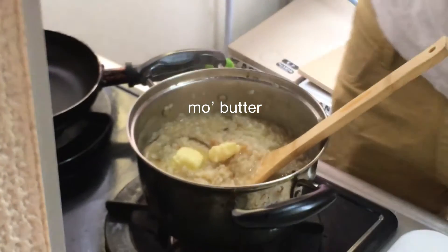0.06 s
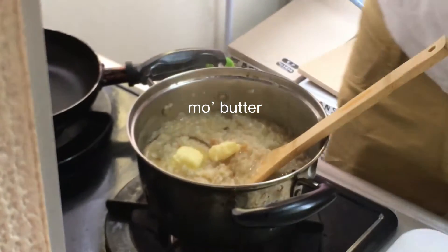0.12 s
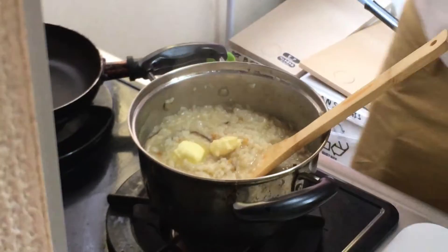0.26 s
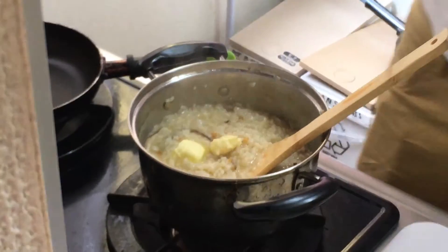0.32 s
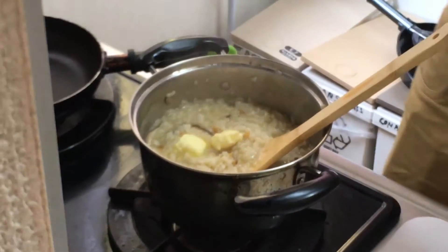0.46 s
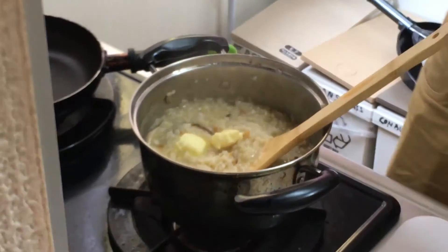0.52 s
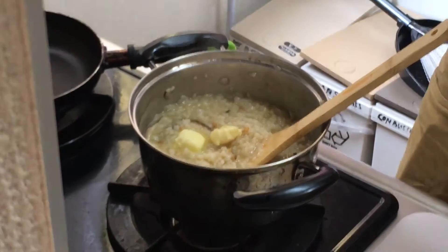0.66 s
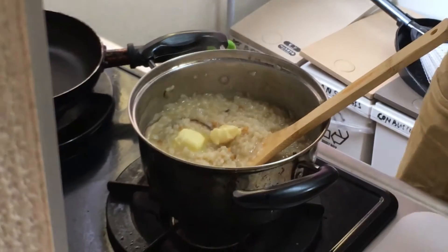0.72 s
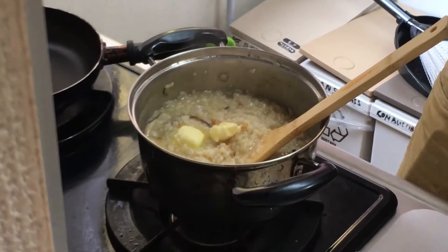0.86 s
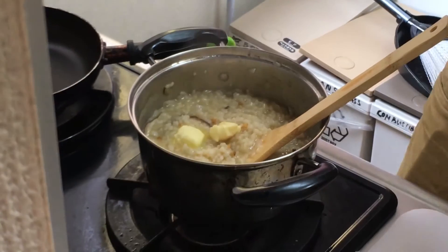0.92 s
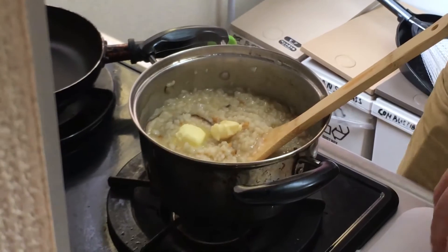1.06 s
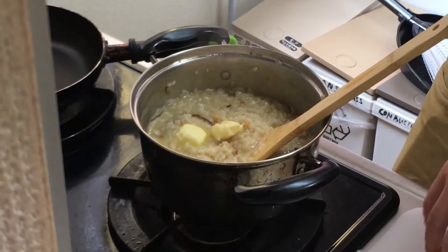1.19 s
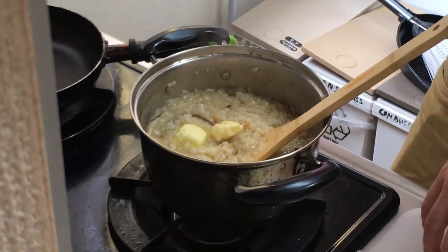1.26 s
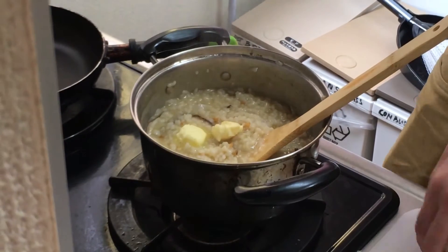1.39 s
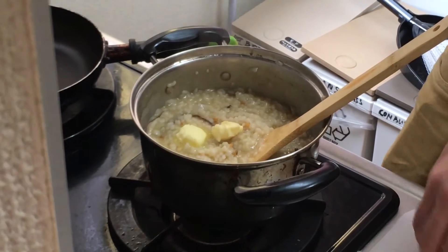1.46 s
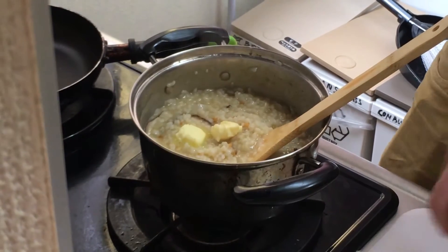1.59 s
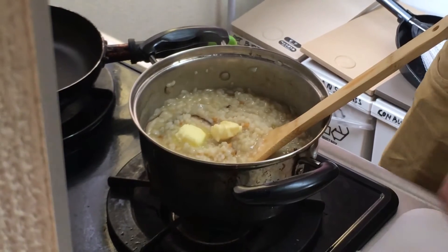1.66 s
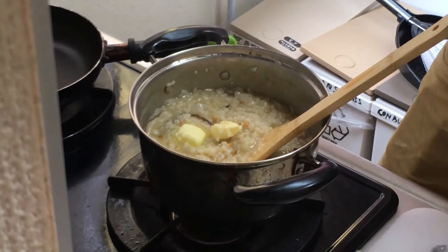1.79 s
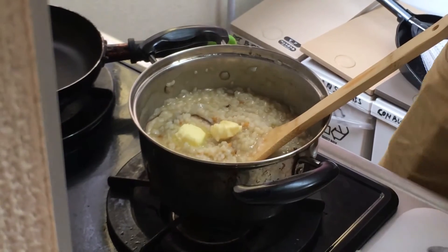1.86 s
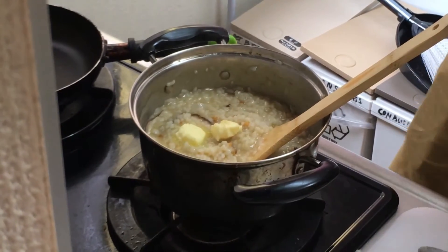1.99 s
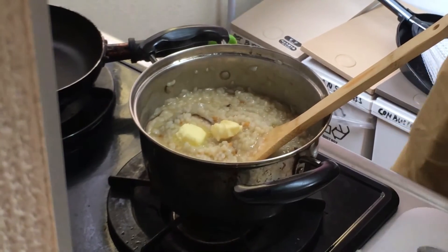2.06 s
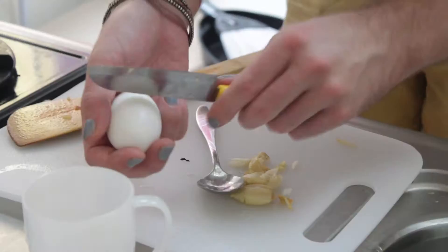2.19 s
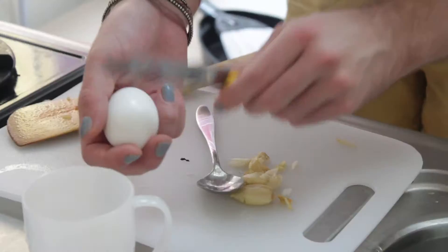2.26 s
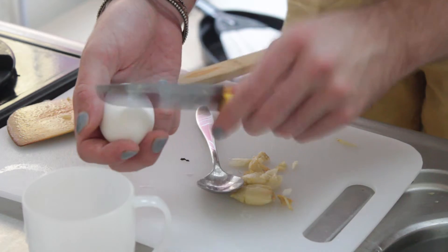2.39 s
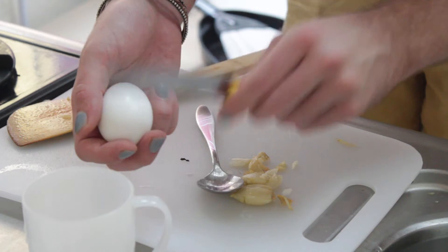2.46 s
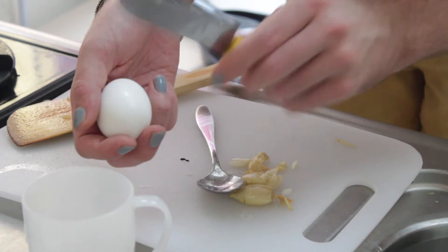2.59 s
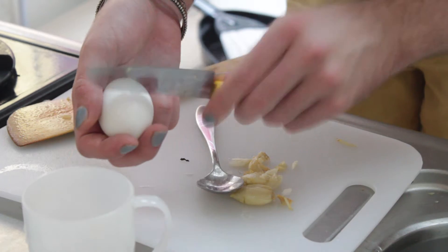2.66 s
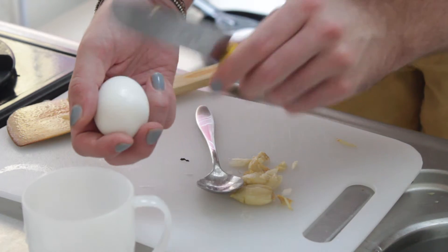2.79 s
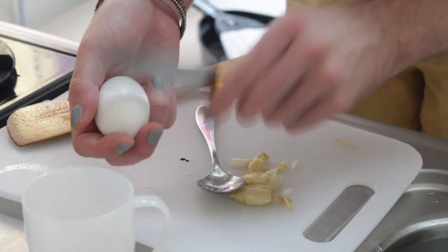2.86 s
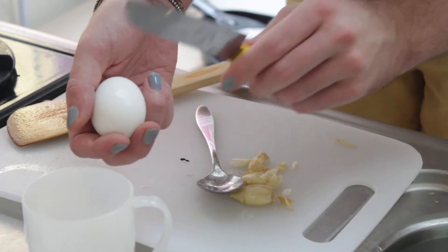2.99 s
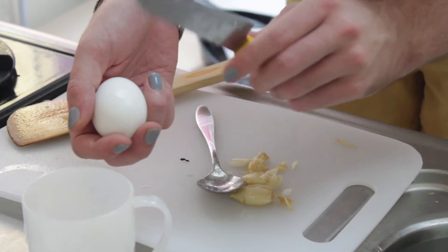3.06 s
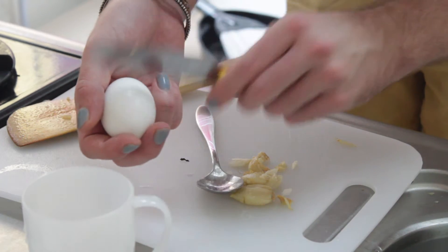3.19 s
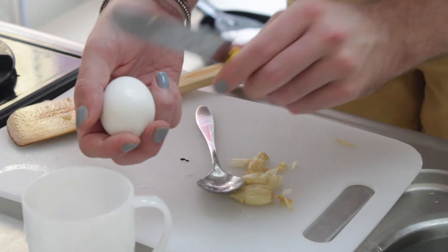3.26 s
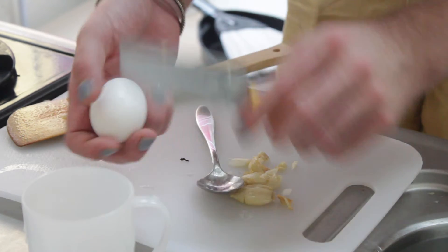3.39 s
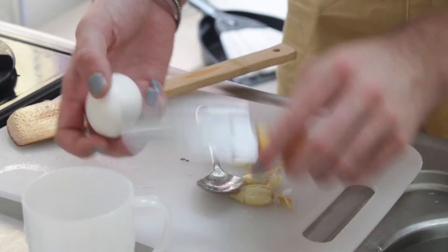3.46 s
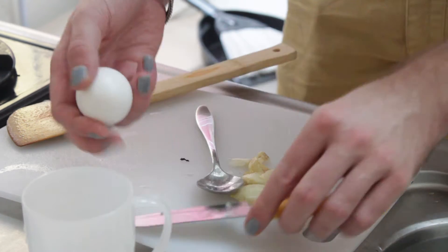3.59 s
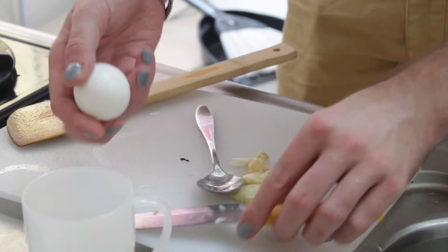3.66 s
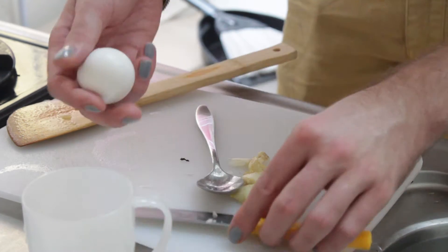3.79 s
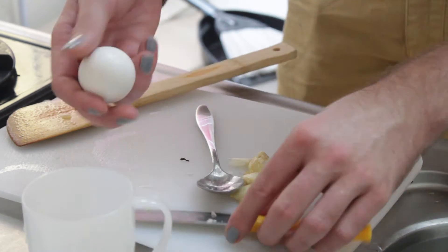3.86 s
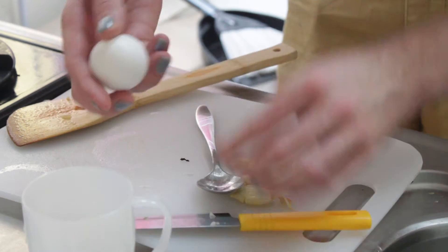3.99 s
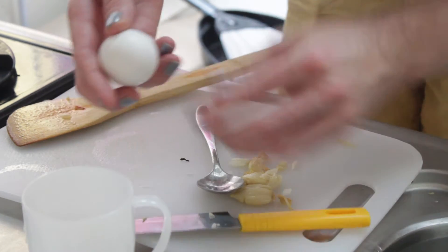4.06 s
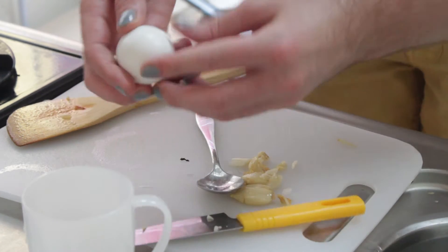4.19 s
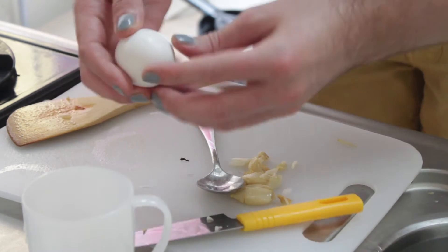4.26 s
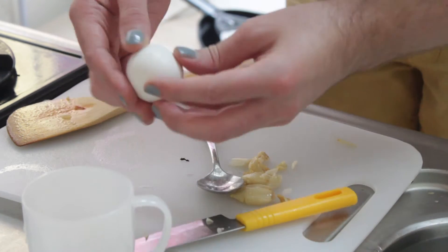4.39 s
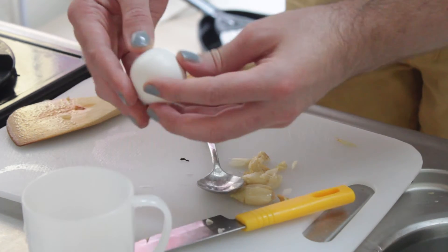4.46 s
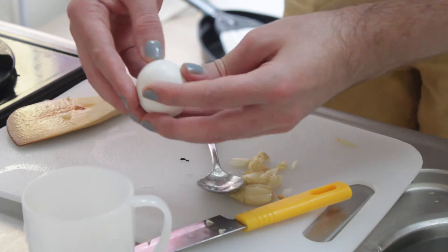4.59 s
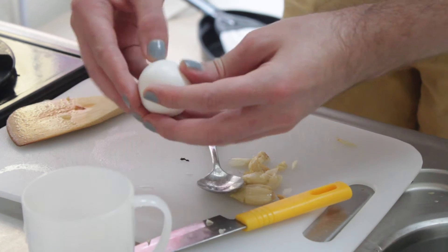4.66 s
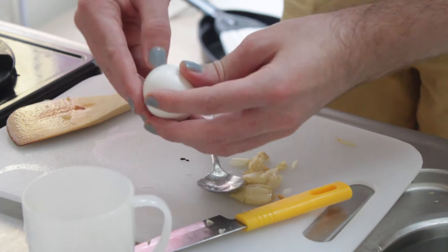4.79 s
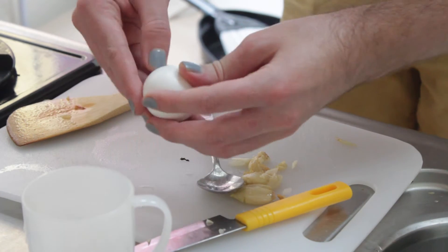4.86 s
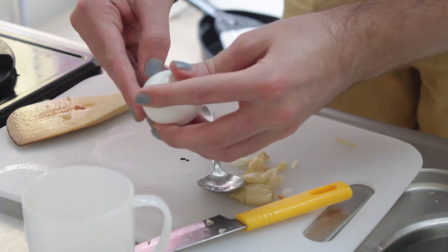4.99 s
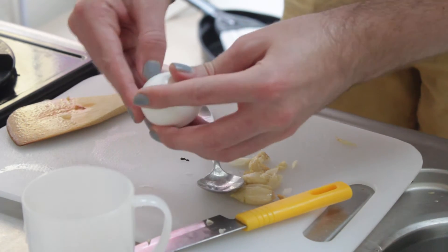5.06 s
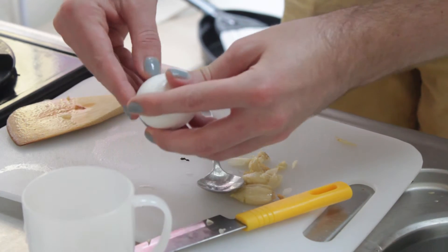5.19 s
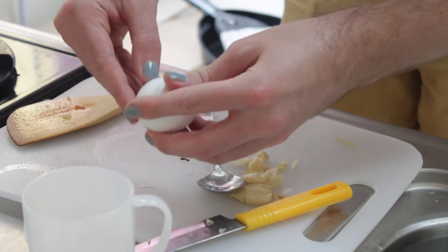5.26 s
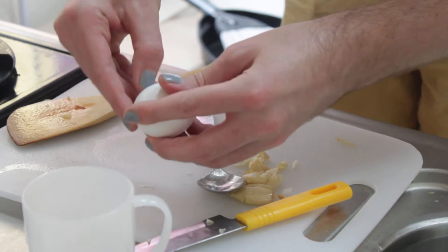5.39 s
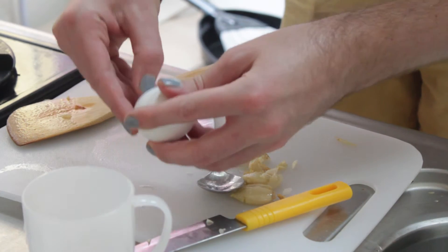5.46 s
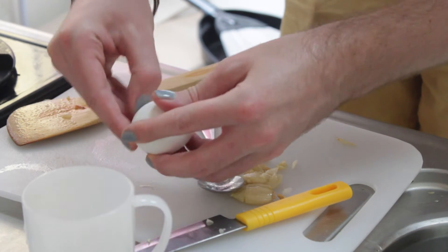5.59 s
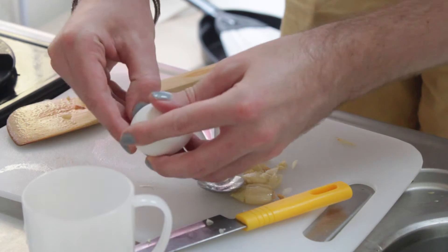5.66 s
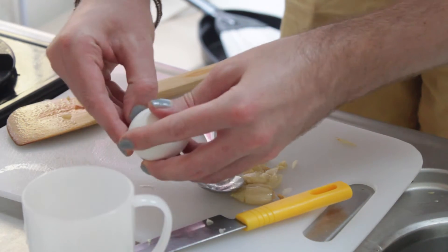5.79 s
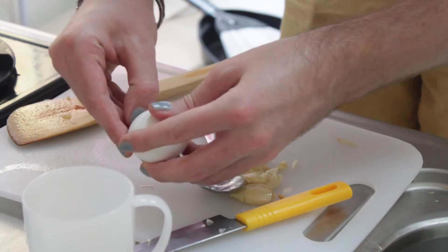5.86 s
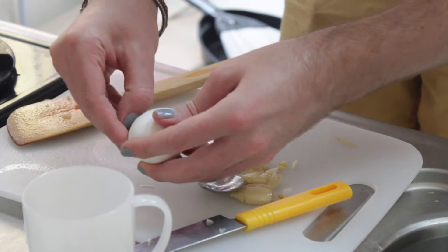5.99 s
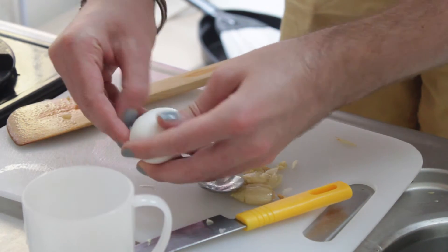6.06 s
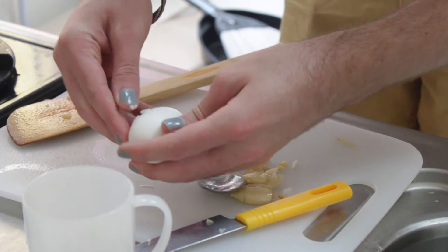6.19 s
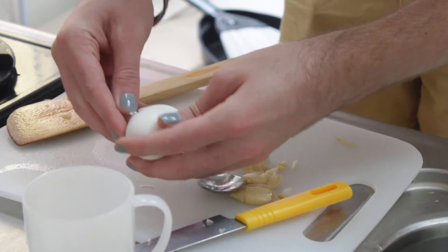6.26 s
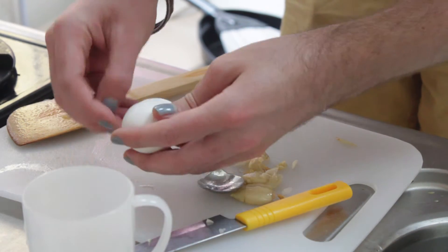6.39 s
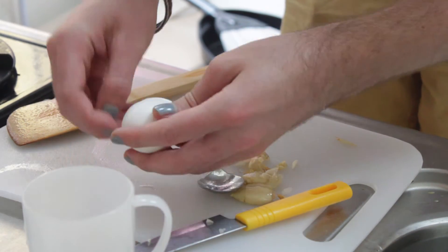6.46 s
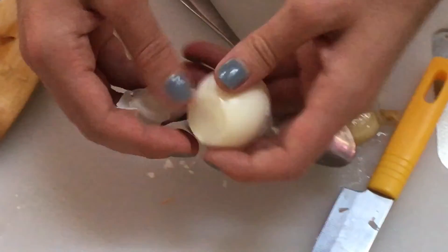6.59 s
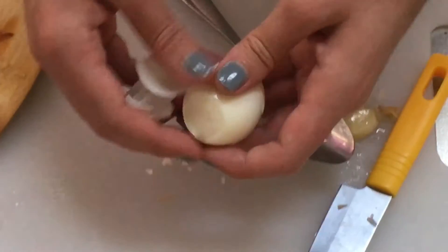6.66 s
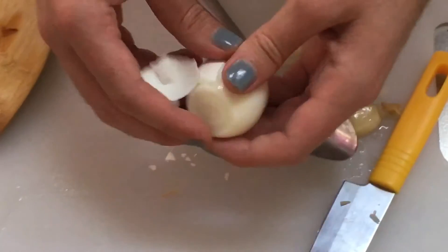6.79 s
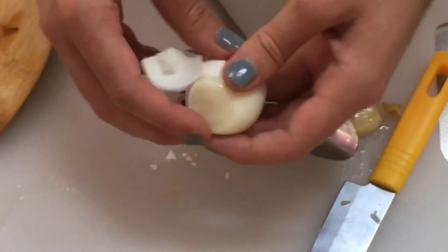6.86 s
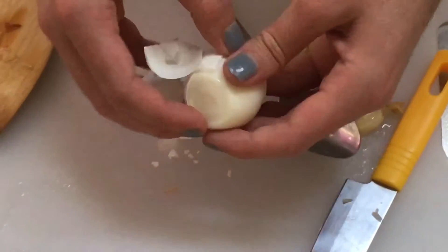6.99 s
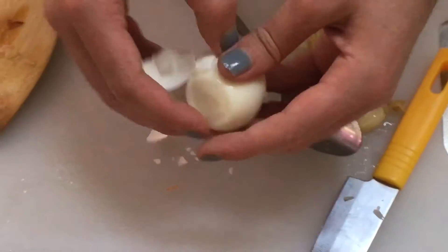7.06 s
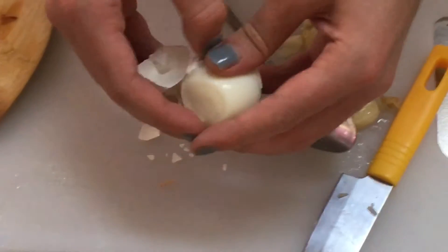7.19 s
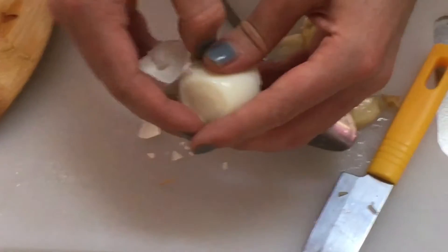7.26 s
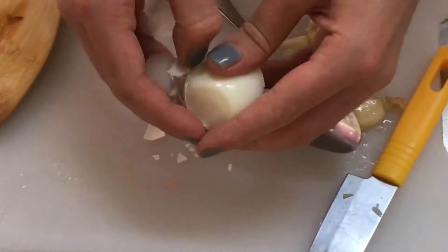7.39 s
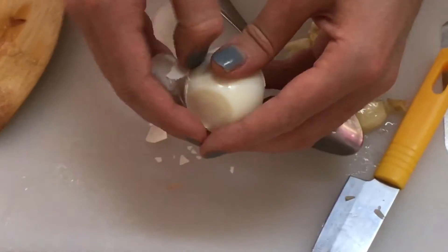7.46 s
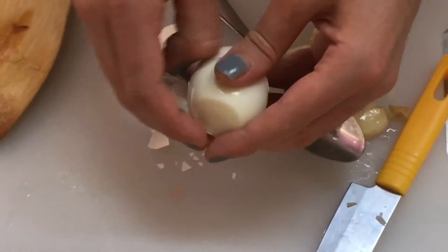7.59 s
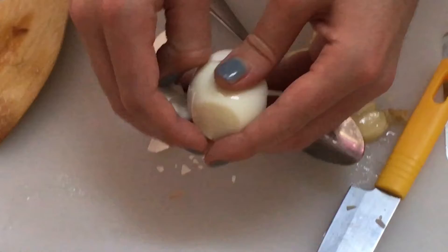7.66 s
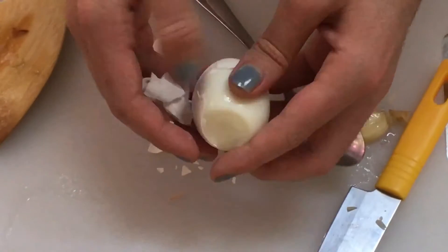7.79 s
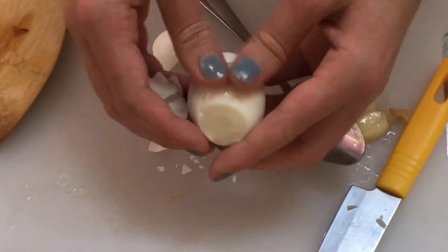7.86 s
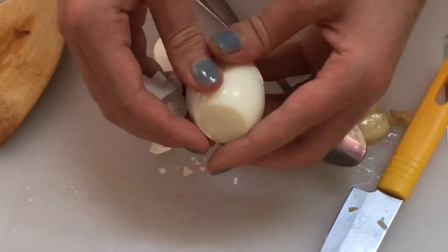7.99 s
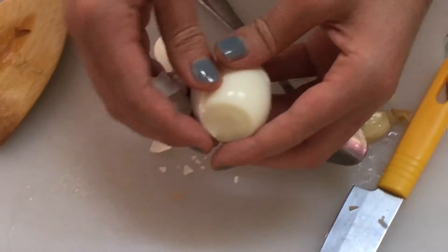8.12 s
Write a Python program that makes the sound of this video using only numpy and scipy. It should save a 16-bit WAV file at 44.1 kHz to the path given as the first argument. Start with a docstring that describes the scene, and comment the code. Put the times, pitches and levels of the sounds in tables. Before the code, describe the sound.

In a small hard kitchen, low rumble carries faint cloth rustles, a tiny bracelet tinkle and soft board knocks. A spoon drops with a clack and short ring. The background switches to simmering and fan hum as a knife cracks an egg with four sharp taps, then clatters onto the board. Close to the microphone, nails make sparse, then dense crisp shell crackles, with fine membrane tearing.

```python
"""A small hard kitchen. First low rumble, rustling cloth, a tinkling bracelet, a spoon falling on a board.
Then a knife taps a boiled egg and is laid down; nails crack and peel the shell; a pot simmers, a fan hums.
Shell breaks are coloured pulses with noise trails; metal is decaying sines; board and pot are noise
through resonances; cloth, scrapes, membrane, fan and room are shaped noise. Hard walls answer the knocks."""
import sys
import numpy as np
from scipy import signal
from scipy.fft import rfft, irfft, next_fast_len
from scipy.io import wavfile
from scipy.ndimage import uniform_filter1d, map_coordinates

SR = 44100
rng = np.random.default_rng(int(sys.argv[2]) if len(sys.argv) > 2 else 0)


def store_wav(level_fs):
    """Save 16-bit WAV to argv[1]."""
    pcm = np.round(np.clip(np.atleast_2d(level_fs), -1, 1) * 32767)
    wavfile.write(sys.argv[1], SR, pcm.T.astype(np.int16))


N = 358974

# All levels in tables are relative: sources add their own gains.
# Knife on egg. Each row: start in seconds, level, body, middle, edge and splintering in dB.
TAPS = [(2.392, -7, -21, -8.5, -13.5, -11), (2.6419, -11, -23.5, -15, -15, -13),
        (2.851, -15, -22, -15, -10, -10.5), (3.1417, -21.5, -7, -7, -9.5, -17)]
# Shell cracks. Each row: start in seconds, level, low part, edge and splintering in dB.
CRACKS = [(4.378, -48, -8, -7, -7), (4.7074, -33, -12.5, -13, -2.5), (4.7414, -32, -19, -8, -19),
          (4.8834, -47, -15, -12, -6), (4.8906, -42, -14, -5, -8), (4.9065, -34.5, -5.5, -6, -16),
          (5.1757, -42, -17, -6, -14), (5.1926, -39, -16, -16, 0), (5.2044, -30.5, -17, -7, -6.5),
          (5.3085, -30.5, -19, -3, -13), (5.3436, -30.5, -19, -9, -13), (5.4537, -26, -18.5, -11.5, -20),
          (5.533, -28, -14, -7, -16), (5.5613, -35, -8, -1, -11), (5.5755, -26.5, -18, -3, -21),
          (5.5893, -27.5, -14, -3, -17), (5.6108, -30, -6, -0.5, -4), (5.8377, -41.5, -10, -7, 4),
          (5.887, -40, -7, -8, -10), (5.9109, -33, -7, -1, 0.5), (6.5572, -35.5, -11, -7, -10),
          (6.6582, -48, -18, -7, -13), (6.7528, -44.5, -8, -6, -5), (6.8096, -40.5, -27, -11, -11),
          (7.0693, -47, -10, 0, -6), (7.0771, -34.5, -6, 1, -20), (7.1826, -35, -7.5, 0, -8),
          (7.2263, -47, -20, -3, -12), (7.2309, -40, -28, -21, -15), (7.2609, -30, -14, -6, -15),
          (7.2915, -40, -22, -3, -16), (7.3, -34, -7, -1, -20), (7.3523, -22.5, -22, -9, -22),
          (7.3734, -30.5, -10.5, -6.5, -6), (7.3958, -33, -13, 0, -13), (7.434, -47, -15, 0, -12),
          (7.4441, -42, -9, 0, -11), (7.5359, -35, 4, -2, -3.5), (7.5415, -36, -4, -7, 4),
          (7.5588, -38, 3, -8, -10), (7.5922, -40, 1.5, -2, -5), (7.6266, -22.5, -25.5, -12, -24),
          (7.648, -33, -19, 1, -8), (7.6808, -42, -17, -1, -12), (7.6949, -39, -8, -16, -20),
          (7.7109, -26, -14, -2, 0)]
# Colours of tap and crack. Each row: frequency in Hz, level in dB; rows are lifted per blow.
TAP_COLOUR = [(300, -22.5), (700, 11), (2200, 12), (4000, 5.5), (6500, -5.5), (12000, 3), (17000, 3.5)]
CRACK_COLOUR = [(600, 6), (1200, 8), (2300, 11), (4200, 7), (8000, -1.5), (13000, 6.5), (17000, 6)]
UNEVEN_DB = 3  # random spread of each piece's colour
TAP_CRUNCH_DB, TAP_CRUNCH_T60_S, TAP_SPLINTER_T60_S, TAP_GRIT_DB = 0, .009, .061, 5
CRACK_CRUNCH_DB, CRACK_CRUNCH_T60_S, CRACK_SPLINTER_T60_S, CRACK_GRIT_DB = 1.5, .016, .075, 4.5
CRUMBS_FROM_S, CRUMBS = 4.6, 14
CRUMB_DB, CRUMB_LOW_DB, CRUMB_EDGE_DB, CRUMB_SPLINTER_DB, CRUMB_SPREAD_DB = -51, -10, -10, -7, 2
# Membrane tearing. Each row: time in seconds, level in dB.
PEEL = [(3.9, -75), (4.3, -56), (4.6, -65), (5.5, -47), (6.36, -53.5), (7.14, -55), (7.34, -46),
        (7.45, -53), (7.54, -61), (7.67, -41.5), (7.85, -55)]
# Membrane colour. Each row: frequency in Hz, level in dB.
MEMBRANE_COLOUR = [(2000, -3), (4500, 1.5), (9000, -10.5), (16000, -4)]
# Nail and loose shell over the egg. Each row: start and length in seconds, level in dB, centre in Hz,
# width in octaves.
SCRAPES = [(5.373, 0.017, -48, 4200, 0.23), (5.485, .012, -52, 11000, .8), (5.54, .06, -46, 11000, .7),
           (5.604, .014, -36, 10000, 1), (5.712, 0.021, -53, 4500, .5), (5.821, 0.036, -53, 4800, .3),
           (5.91, 0.022, -49, 6000, 1), (6.045, 0.027, -54, 4000, .4), (6.186, 0.018, -47.5, 4760, .25),
           (6.268, 0.03, -51, 5430, 0.81), (6.297, .012, -55, 13000, .3), (6.379, 0.072, -54, 10000, 0.78),
           (6.606, 0.032, -52, 5000, 0.91), (6.71, .02, -54, 11000, 0.54), (6.75, 0.035, -52.5, 4500, 0.46),
           (6.866, 0.042, -54, 4500, 0.72), (6.955, .04, -54, 12000, .5), (7.07, 0.028, -61, 3500, 0.56),
           (7.247, .07, -49.5, 3500, .5), (7.359, .04, -47, 4000, 0.41), (7.323, .03, -44, 8000, .7),
           (7.356, 0.025, -39, 12000, .5), (7.536, 0.073, -44.5, 2500, 1), (7.603, .018, -37, 12000, .5),
           (7.712, 0.024, -44, 3000, 0.69), (7.651, 0.097, -50.5, 9000, 0.93)]
SCRAPE_RISE_S, SCRAPE_FALL_S, SCRAPE_GRAIN_DB = .0015, .014, 5
# Knife ring. Each row: frequency in Hz, level in dB, t60 in seconds.
BLADE = [(5700, -22, 0.081), (6430, -24, .04), (6600, -3, 0.025), (11140, 13, 0.0064)]
# A brief metallic ring. Each row: start in seconds, level in dB, t60 in seconds.
CHINK = [(2.1857, -22, 0.22)]
# Broad steel resonances. Each row: centre and width in Hz, level in dB.
STEEL = [(1090, 370, -5.5), (3290, 1000, -13.5), (5540, 320, 1), (7150, 700, -6), (10000, 1400, -10.5),
         (14400, 710, -12)]
# Blows on the board. Each row: start in seconds, level, click of a hard edge, handle over board in dB.
KNOCKS = [(1.301, -42.5, -31, 3), (1.396, -46, -29, 5), (1.7215, -44, -25, 6), (2.072, -52, -30, 7),
          (2.121, -25.5, -16, 0), (3.605, -28, -12, -1), (3.611, -30, -31, -3), (3.625, -31, -19, 10),
          (3.75, -48, -3, -6), (3.8085, -13, -25, 3), (3.8186, -15.5, -17.5, -8.5),
          (3.827, -19, -19.5, -4.5), (3.841, -22.5, -20, -1), (3.852, -27, -22, -3.5),
          (3.863, -27.5, -29, -2), (3.899, -38, -26, 3), (4.539, -35, -30, -2)]
# Board resonances, used almost squared. Each row: centre and width in Hz, level in dB.
BOARD = [(206, 103, -2.5), (528, 94, 2), (731, 72, 1), (1366, 166, -1)]
# Resonances of what is put down, used alike. Each row: centre and width in Hz, level in dB.
HANDLE = [(908, 158, 1.5), (1540, 120, -2.5), (2050, 160, -3.5), (2450, 320, -4.5), (3060, 190, -12)]
# Click of a hard edge. Each row: frequency in Hz, level in dB.
EDGE_COLOUR = [(900, -20), (2200, 0), (3000, 0), (5000, -5), (8000, -14), (14000, -22), (16000, -30)]
KNOCK_T60_S, BLOW_DB = .055, 28  # chatter decay; first sample of the blow
GRIP_SHIFT = .045  # relative random shift of the resonances at each blow
FILL_DB = -12  # between the resonances
# Spoon contacts. Each row: start in seconds, ring in dB, brightness in dB per octave, clack in dB.
CLINKS = [(2.1167, -35.5, -1.5, 4.5), (2.161, -39.5, -1, 4.5)]
# Spoon ring. Each row: frequency in Hz, level in dB, t60 in seconds.
SPOON = [(915, -5, .15), (1039, -4, .15), (1455, -6, .07), (2078, -6, .09), (2261, -10, .1),
         (3101, -9, .12), (3650, -15, .15), (4000, -13, .2), (5658, -19, .15), (5798, -12, .3),
         (7138, -15, .3), (8995, -23, .2), (10800, -27, .2), (12610, -22, .2)]
# Spoon clack. Each row: frequency in Hz, level in dB.
CLACK_COLOUR = [(500, -39), (1100, 13), (2000, 17), (3500, 9), (5000, -20), (16000, -16)]
SPOON_FADE_FROM_S = 2.187
# Bracelet contacts. Each row: start in seconds, level and low ring in dB.
TINKLES = [(0.301, -46, -13), (0.309, -35.5, -6), (.368, -58, -12), (1.2265, -52, -2), (1.236, -58, -3),
           (1.259, -56, 8), (1.301, -53, -2), (3.603, -50.5, 9), (3.628, -58, -3), (4.22, -53, 1),
           (4.292, -61, -4), (5.1028, -48, -4), (6.0, -67, 2), (7.7544, -59, -14)]
# Bracelet ring. Each row: frequency in Hz, level in dB, t60 in seconds; the first four are the low ring.
BRACELET = [(5670, -16, 0.078), (9000, -5, 0.055), (9240, -8, .045), (11300, -10, 0.064),
            (13100, -8, 0.055), (13370, 7.5, 0.04), (14440, -8, .033), (14850, -10, .06)]
LINK_TOUCH_S, JINGLE_DB = .004, 3  # links slide into contact and keep shaking
# Rub strokes of cloth and skin. Each row: loudest time, rise and fall in seconds, level, low scrape and
# high squeak in dB.
RUSTLE = [(0.188, .05, .05, -66, -1, -19), (0.314, 0.033, .03, -73, -20, -12),
          (0.422, 0.12, .1, -60.5, -0.5, -16), (0.652, 0.015, 0.066, -58.5, 1, -15),
          (0.701, .007, 0.036, -44, -28, 0), (0.7, .12, .13, -57, -0.5, -2),
          (0.745, .04, 0.016, -56, -19, -9), (0.773, .004, 0.025, -54.5, -10, 0),
          (0.811, .003, .035, -55, -6, -8), (0.843, 0.027, 0.019, -54, 2.5, -4),
          (0.9, .04, .04, -71, 2, -10), (1.275, 0.026, 0.033, -57, -21, -6),
          (1.292, .02, 0.022, -57, -21, -4), (1.38, .06, .06, -59, -19, -10),
          (1.738, 0.017, 0.019, -59.5, -25, 10.5), (1.82, 0.029, .026, -63, -4, 1.5),
          (1.889, .02, .02, -62.5, -14, 0), (2.007, .03, .03, -58.5, 0, -4),
          (2.05, .033, 0.043, -62, -2, -18)]
# Broad cloth colour. Each row: frequency in Hz, level in dB.
CLOTH = [(900, -26), (2000, -4), (4500, -3.5), (9000, -11.5), (16000, -8.5)]
# Further cloth and skin bands. Each row: frequency in Hz, level in dB.
BRIGHT_COLOUR = [(8000, -35), (10500, -14), (16000, -3)]
SCRAPE_COLOUR = [(2300, -30), (3100, -18), (4000, -31)]
SQUEAK_COLOUR = [(5600, -36), (6600, -17), (7700, -30)]
# Louder strokes have more of the bright band and less of the broad one (dB per dB over the pivot).
BRIGHT_DB, BROAD_DB, STROKE_PIVOT_DB, BRIGHT_GROWS, BROAD_GROWS = -1, -5, -63, .33, -.2
# Short soft notes near 600 Hz within the simmer. Each row: start in seconds, level in dB,
# starting pitch in Hz.
SIMMER_NOTES = [(3.037, -27.5, 595), (4.128, -29, 627), (4.389, -26, 600), (4.45, -24.5, 617),
                (5.37, -28.5, 603), (5.596, -30.5, 640), (5.705, -28, 577), (6.357, -25.5, 594),
                (6.666, -22, 620), (6.79, -20, 590), (6.947, -27, 612), (7.278, -29, 610),
                (7.685, -27.5, 606), (7.809, -27, 612), (7.875, -27, 576), (7.989, -28, 526)]
# Faint thin tone: start and end in seconds, frequency in Hz, level in dB.
WHISTLE = (2.3, 2.5, 4011, -74)
# Common level of simmer and fan: silent before the first row, dips briefly, then climbs back.
# Each row: time in seconds, level in dB.
BACKGROUND = [(2.187, -51.5), (2.26, -50), (2.36, -49.5), (2.53, -57.5), (3.11, -51.5), (3.7, -49),
              (5, -47.5), (6.5, -48.5), (8.14, -47.5)]
# Pot resonances, applied twice. Each row: centre and width in Hz, level of one pass in dB.
POT = [(191, 120, -10.5), (305, 13, -5.5), (398, 14.3, -4.5), (514.2, 33.7, -1.5), (611, 88, -2),
       (715, 79, -10), (811.5, 14, -4), (1474, 246, -8.5), (1882, 68, -8)]
# Fan colour. Each row: frequency in Hz, level in dB per Hz.
HISS = [(41, -53), (70, -11.5), (286, -3), (336, -7.5), (441, -7), (620, -3), (913, -12.5), (1230, -17.5),
        (1510, -13), (3110, -21.5), (11600, -30), (16000, -36.5)]
SIMMER_DB, SWELL_DB, FAN_DB, FAN_WAVER_DB = 3.5, -.5, 3.5, 1.2  # over the background level
# Room tone. Each row: start in seconds, rumble and quiet air in dB; levels step at each row.
ROOM = [(0, -39.5, -63), (2.2, -49, -92), (2.41, -61.5, -96), (6.549, -44.5, -110)]
# Rumble colour. Each row: frequency in Hz, level in dB per Hz.
RUMBLE = [(15, -69), (25, 11.5), (48, -4.5), (97, -9.5), (157, -18.5), (193, -17), (258, -33.5),
          (450, -31.5), (580, -85), (990, -120)]
# Air colour. Each row: frequency in Hz, level in dB per Hz.
AIR = [(180, -18), (300, -8), (331, -3.5), (366, -15), (486, -13.5), (814, -20.5), (1040, -19.5),
       (1660, -21), (4590, -34.5), (16000, -36)]
# Wall reverberation. Each row: frequency in Hz, t60 in seconds.
WALLS = [(300, 0.55), (1500, 0.21), (4000, 0.27), (9000, 0.22), (16000, 0.11)]
TAP_ROOM_DB, CRACK_ROOM_DB = 8, 11.5
FIRST_ROOM_DB, LATER_ROOM_DB = -7, -3.5  # the walls answer less before the first spoon contact
TOP_HZ = 15800


def amp(db):
    """Decibels to amplitude."""
    return 10 ** (np.asarray(db) / 20)


def unit(x):
    """Scales to rms 1."""
    return x / np.sqrt(np.mean(x ** 2) + 1e-20)


def seconds(length=N):
    """Time of each sample."""
    return np.arange(length) / SR


def along(points, hz):
    """Interpolates (Hz, value) points on a log frequency axis."""
    f, v = np.transpose(points)
    return np.interp(np.log(hz + 1), np.log(f + 1), v)


def level_curve(points):
    """(s, dB) points to dB per sample, silent outside the table."""
    s, db = np.transpose(points)
    return np.interp(seconds(), s, db, left=-200, right=-200)


def wobble(rate_hz):
    """Smooth random curve, rate_hz knots a second."""
    knots = rng.standard_normal(int(N * rate_hz / SR) + 4)
    return map_coordinates(knots, [np.arange(N) * rate_hz / SR])


def filtered(x, response):
    """x times a complex response of frequency."""
    m = next_fast_len(x.shape[-1] + 8192)
    return irfft(rfft(x, m) * response(np.fft.rfftfreq(m, 1 / SR)), m)[..., :x.shape[-1]]


def noise(spectrum, size=N):
    """Noise of rms 1 with a (Hz, dB) colour."""
    return unit(filtered(rng.standard_normal(size), lambda hz: amp(along(spectrum, hz))))


def grit(size, smooth_samples, depth_db):
    """Separate grains: smoothed noise as a level in dB, rms 1 overall."""
    lumps = uniform_filter1d(rng.standard_normal(size), size=smooth_samples)
    return unit(amp(depth_db * unit(lumps)))


def body(modes):
    """Causal response of (Hz, width Hz, dB) resonances with alternating signs."""
    def response(f):
        return sum((-1) ** k * amp(db) * 1j * f * w / (c * c - f * f + 1j * f * w)
                   for k, (c, w, db) in enumerate(modes))
    return response


def add(track, s, sound):
    """Mixes a sound in at time s."""
    part = track[round(s * SR):][:len(sound)]
    part += sound[:len(part)]


def ring(modes, tilt_db=0, touch_s=0.000084):
    """Struck metal: decaying sines; every blow shares out its strength anew."""
    t = seconds(SR // 2)
    share_db = rng.normal(0, 2, len(modes))
    out = np.zeros(len(t))
    for (hz, db, t60_s), more_db in zip(modes, share_db):
        level_db = db + tilt_db * np.log2(hz / 4000) + more_db
        out += amp(level_db - 60 * t / t60_s) * np.sin(2 * np.pi * hz * t)
    return out * (1 - np.exp(-t / touch_s))


def snaps(table, colour_db, crunch_db, crunch_t60_s, splinter_t60_s, grit_db):
    """Brittle breaks: a sharp pulse, a short crunch, trailing splinters; uneven resonances per piece."""
    pulses, trail, t = np.zeros(N), np.zeros(N), seconds(SR // 8)
    bands_hz = np.geomspace(300, 17000, 28)
    click = 1. * (np.arange(len(t)) == 12)
    for s, db, body_db, middle_db, edge_db, splinter_db in table:
        lift_db = [body_db, body_db, body_db, middle_db, 0, edge_db, edge_db]
        smooth = [(hz, level + more) for (hz, level), more in zip(colour_db, lift_db)]
        uneven_db = UNEVEN_DB * rng.standard_normal(len(bands_hz))
        colour = np.column_stack([bands_hz, along(smooth, bands_hz) + uneven_db])
        size = amp(db + max(0, middle_db, edge_db))  # the strongest part sets the size
        pulse = filtered(click, lambda hz: amp(along(colour, hz)))
        add(pulses, s, size * pulse / pulse.max())
        crunch = amp(crunch_db - 60 * t / crunch_t60_s)
        splinters = amp(splinter_db - 60 * t / splinter_t60_s) * grit(len(t), 50, grit_db)
        fade = crunch + splinters
        grains = fade * noise(colour, size=len(t))
        add(trail, s, size * grains * np.linalg.norm(fade) / np.linalg.norm(grains))
    return pulses, trail


def knife_taps():
    """Knife on egg: pulses and trails of brittle breaks."""
    return snaps(TAPS, TAP_COLOUR, TAP_CRUNCH_DB, TAP_CRUNCH_T60_S, TAP_SPLINTER_T60_S, TAP_GRIT_DB)


def shell_cracks():
    """Loud cracks, and small crumbs that break off at random times."""
    when_s = rng.uniform(CRUMBS_FROM_S, N / SR, CRUMBS)
    levels_db = CRUMB_SPREAD_DB * rng.standard_normal((CRUMBS, 3)) + [CRUMB_DB, CRUMB_LOW_DB, CRUMB_EDGE_DB]
    crumbs = np.column_stack([when_s, levels_db, np.full(CRUMBS, CRUMB_SPLINTER_DB)])
    rows = [(s, db, low_db, low_db, edge_db, splinter_db)
            for s, db, low_db, edge_db, splinter_db in [*CRACKS, *crumbs]]
    return snaps(rows, CRACK_COLOUR, CRACK_CRUNCH_DB, CRACK_CRUNCH_T60_S, CRACK_SPLINTER_T60_S,
                 CRACK_GRIT_DB)


def membrane():
    """The skin under the shell tears with a fine, grainy fizz."""
    grain_db = 4 * wobble(200)
    return amp(level_curve(PEEL) - 5 + grain_db) * noise(MEMBRANE_COLOUR)


def scrapes():
    """Ragged friction: grainy noise in one broad band, quick to start, trailing off."""
    out, t = np.zeros(N), seconds(SR // 5)
    for s, length_s, db, centre_hz, octaves in SCRAPES:
        band = unit(filtered(rng.standard_normal(len(t)),
                             lambda f: np.exp(-.5 * (np.log2((f + 1) / centre_hz) / octaves) ** 2)))
        grain = grit(len(t), 30, SCRAPE_GRAIN_DB)
        rise = 1 - np.exp(-t / SCRAPE_RISE_S)
        fall = np.exp(-np.clip(t - length_s, 0, 1) / SCRAPE_FALL_S)
        add(out, s, amp(db) * rise * fall * grain * band)
    return out


def blade():
    """The knife rings briefly at each tap."""
    out = np.zeros(N)
    for s, db, *_ in TAPS:
        add(out, s, amp(db - 14) * ring(BLADE))
    return out


def chink():
    """Decaying noise shakes broad resonances of steel: a brief metallic ring."""
    out, t = np.zeros(N), seconds(SR // 2)
    for s, db, t60_s in CHINK:
        steel = unit(filtered(rng.standard_normal(len(t)), body(STEEL)))
        add(out, s, amp(db - 10 - 60 * t / t60_s) * steel)
    return out


def board():
    """A blow and its chatter ring the board and the thing put down; a hard edge adds a click."""
    out, t = np.zeros(N), seconds(SR // 4)
    fade = amp(-60 * t / KNOCK_T60_S)

    def shifted(modes):
        return body([(c * (1 + GRIP_SHIFT * rng.standard_normal()), w, db) for c, w, db in modes])

    for s, db, click_db, handle_db in KNOCKS:
        chatter = fade * rng.standard_normal(len(t))
        chatter[0] += amp(BLOW_DB)
        low, high = shifted(BOARD), shifted(HANDLE)

        def response(hz):
            return sum(amp(part_db) * part(hz) * (part(hz) + amp(FILL_DB))
                       for part, part_db in [(low, -handle_db), (high, handle_db)])

        thud = filtered(chatter, response)
        click = fade * (1 - np.exp(-t / 0.0007)) * noise(EDGE_COLOUR, size=len(t))
        add(out, s, amp(db) * (thud / np.abs(thud).max() + amp(click_db) * click))
    return out


def spoon():
    """The spoon rings and clacks at each contact; a fast fade ends the sound."""
    out, t = np.zeros(N), seconds(SR // 2)
    for s, db, tilt_db, clack_db in CLINKS:
        fade = amp(clack_db - 60 * t / .02) + amp(clack_db - 8 - 60 * t / .2)
        clack = fade * noise(CLACK_COLOUR, size=len(t))
        add(out, s, amp(db) * (ring(SPOON, tilt_db) + clack))
    return out * amp(-2000 * np.clip(seconds() - SPOON_FADE_FROM_S, 0, 1))


def bracelet():
    """Links touch softly and ring; the level shakes."""
    out = np.zeros(N)
    for s, db, low_db in TINKLES:
        high = amp(db) * ring(BRACELET[4:], touch_s=LINK_TOUCH_S)
        low = amp(db + low_db) * ring(BRACELET[:4], touch_s=LINK_TOUCH_S)
        add(out, s, high + low)
    return out * amp(JINGLE_DB * wobble(150))


def rustle():
    """Cloth fibres slip in a grainy rush; strokes swell and fade in broad, bright, low and high bands."""
    broad, bright = noise(CLOTH), noise(BRIGHT_COLOUR)
    scrape, squeak = noise(SCRAPE_COLOUR), noise(SQUEAK_COLOUR)
    grain, out, t = amp(2.5 * wobble(450)), np.zeros(N), seconds(3 * SR)
    for s, rise_s, fall_s, db, scrape_db, squeak_db in RUSTLE:
        over_db = db - STROKE_PIVOT_DB
        mix = amp(BROAD_DB + BROAD_GROWS * over_db) * broad + amp(BRIGHT_DB + BRIGHT_GROWS * over_db) * bright
        mix += amp(scrape_db) * scrape + amp(squeak_db) * squeak
        # about 18 dB down after one rise or fall time
        stroke = amp(-(20 * np.maximum((s - t) / rise_s, (t - s) / fall_s)) ** 0.97)
        add(out, 0, amp(db) * stroke * mix[:len(t)])
    return grain * out


def simmer_notes():
    """Short soft notes: decaying sines with a soft start and a slightly rising pitch."""
    out, t = np.zeros(N), seconds(SR // 8)
    for s, db, hz in SIMMER_NOTES:
        fade = amp(db + 1.5 - 60 * t / 0.036) * (1 - np.exp(-t / 0.0015))
        add(out, s, fade * np.sin(2 * np.pi * hz * t * (1 + 1.3 * t)))
    return out


def whistle():
    """A faint thin sine, briefly."""
    start_s, end_s, hz, db = WHISTLE
    t = seconds()
    gate = np.clip(np.minimum(t - start_s, end_s - t) / .006, 0, 1)
    return amp(db) * gate * np.sin(2 * np.pi * hz * t)


def simmer_and_fan():
    """Bubble bursts, as lumpy noise, ring the pot's resonances over the rush of a fan."""
    bursts = amp(3.14 * wobble(45) + 0.32 * wobble(13)) * rng.standard_normal(N)
    pot = unit(filtered(bursts, lambda hz: body(POT)(hz) ** 2))
    simmer = amp(SIMMER_DB + SWELL_DB * wobble(2.63)) * pot
    fan = amp(FAN_DB + FAN_WAVER_DB * wobble(8)) * noise(HISS)
    return amp(level_curve(BACKGROUND)) * (simmer + fan)


def room_tone():
    """Lumpy building rumble and faint air; base levels step abruptly at set times."""
    starts_s, rumble_db, air_db = np.transpose(ROOM)
    place = np.searchsorted(starts_s, seconds(), side="right") - 1
    rumble = amp(rumble_db[place] + 1.2 * wobble(6.5)) * noise(RUMBLE)
    return rumble + amp(air_db[place]) * noise(AIR)


def walls(x):
    """Tiles and cupboards answer with decaying noise, a fresh tail every 0.2 s."""
    out, step = np.zeros(N), SR // 5
    for start in range(0, N, step):
        hz, t, z = signal.stft(rng.standard_normal(SR // 2), SR, nperseg=256)
        decay = amp(-60 * t / along(WALLS, hz)[:, None])
        tail = signal.istft(z * decay, SR, nperseg=256)[1]
        add(out, start / SR + .003, signal.fftconvolve(x[start:start + step], tail / np.linalg.norm(tail)))
    return out


def scene():
    """Mixes all sources and the walls' answer to the knocks."""
    tap, tap_trail = knife_taps()
    crack, crack_trail = shell_cracks()
    pulses = tap + amp(4) * crack
    near = bracelet() + board() + simmer_notes()
    dry = tap_trail + crack_trail + membrane() + scrapes() + blade() + chink() + spoon() + rustle() + whistle()
    near_room_db = np.where(seconds() < CLINKS[0][0], FIRST_ROOM_DB, LATER_ROOM_DB)
    wet = walls(amp(TAP_ROOM_DB) * tap + amp(CRACK_ROOM_DB) * crack + amp(near_room_db) * near)
    return (pulses + near + wet + dry + simmer_and_fan() + room_tone())[None]


def record(dry):
    """The microphone rounds off the loudest peaks, drops the deepest bass and cuts steeply above TOP_HZ."""
    rounded = dry / (1 + np.abs(dry / .7) ** 4) ** (1 / 4)

    def response(hz):
        bass_cut = 1 / (1 + (41 / (hz + 1)) ** 12)
        return bass_cut * amp(-np.clip((hz - TOP_HZ) / 14, 0, 100))

    return filtered(rounded, response)


dry = scene()
out = record(dry)
store_wav(out)
```